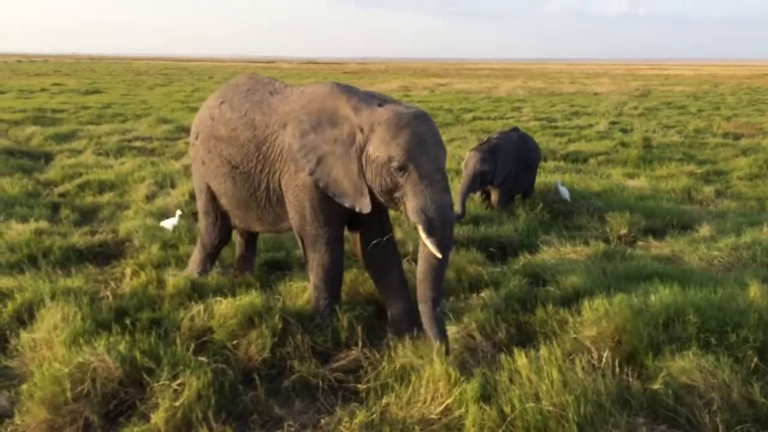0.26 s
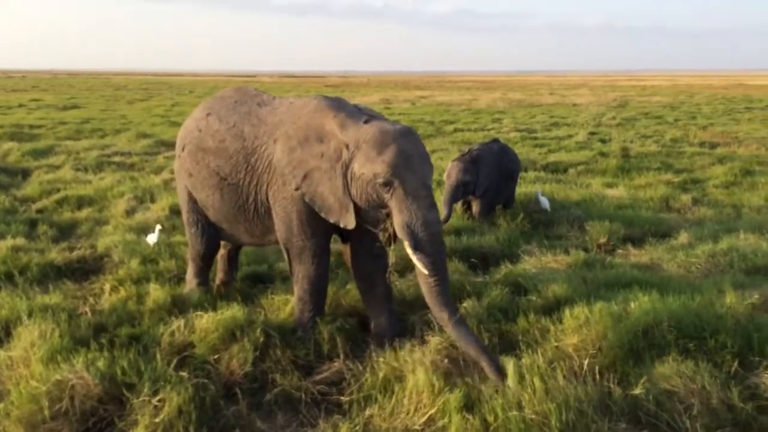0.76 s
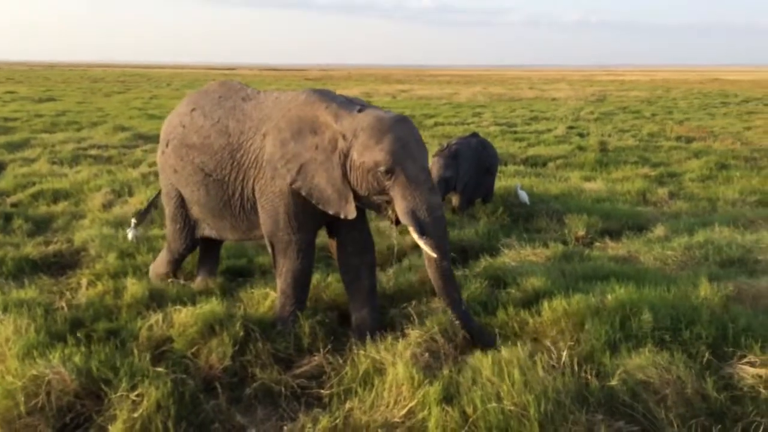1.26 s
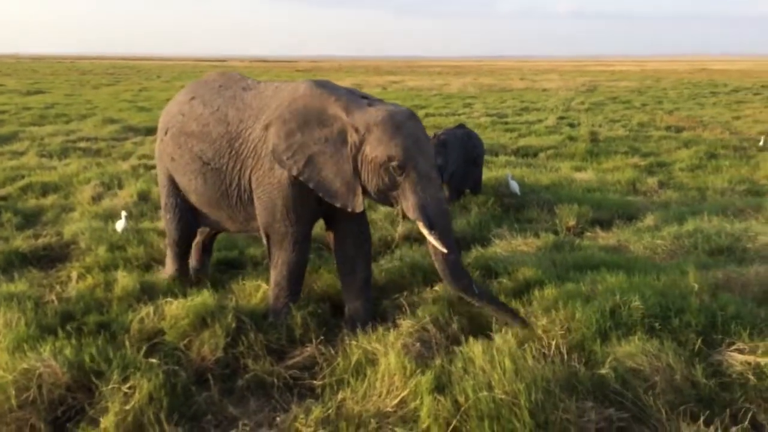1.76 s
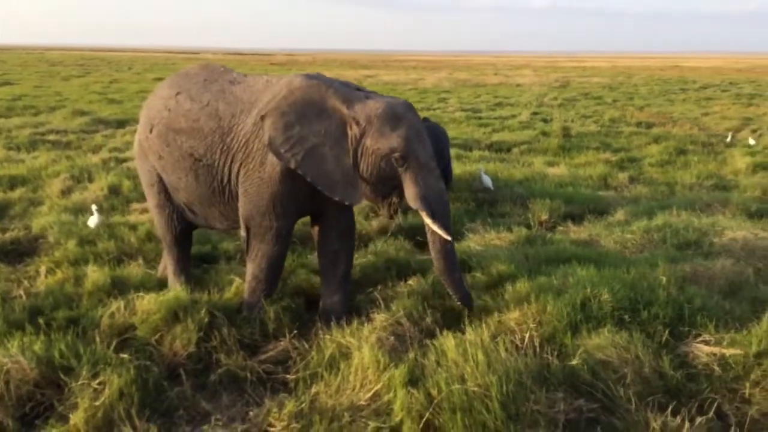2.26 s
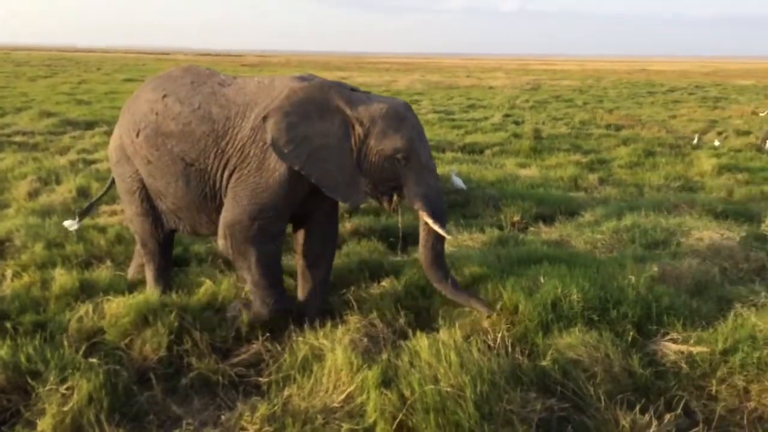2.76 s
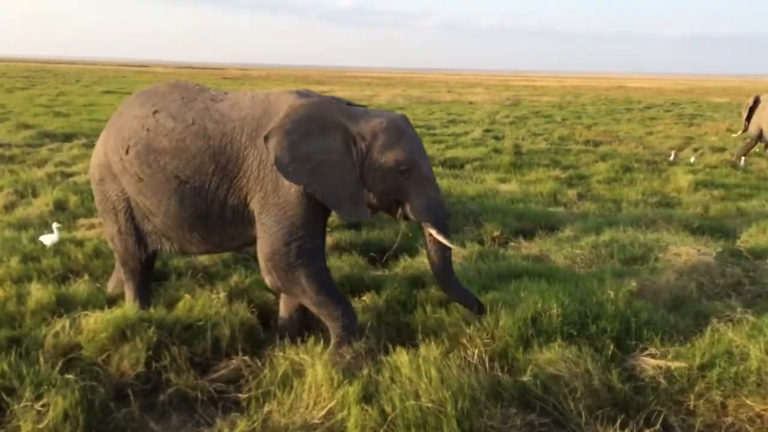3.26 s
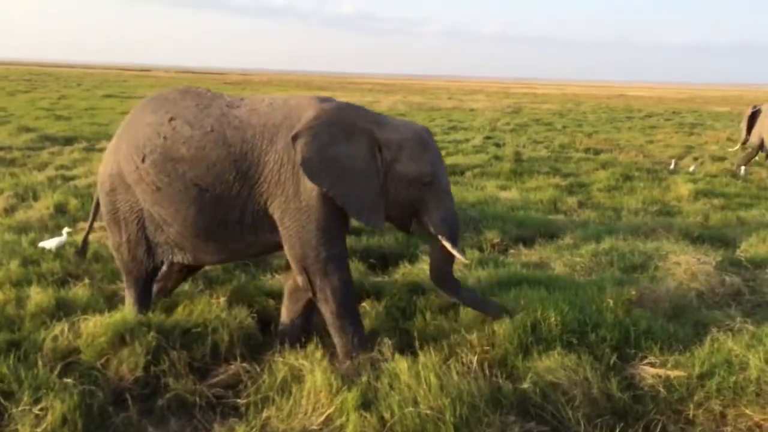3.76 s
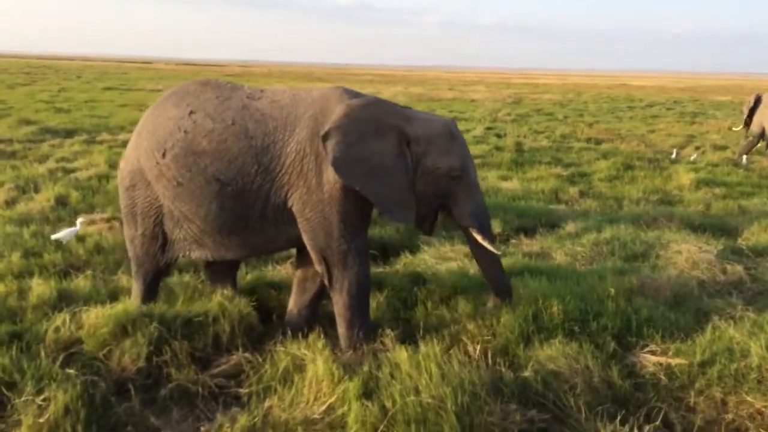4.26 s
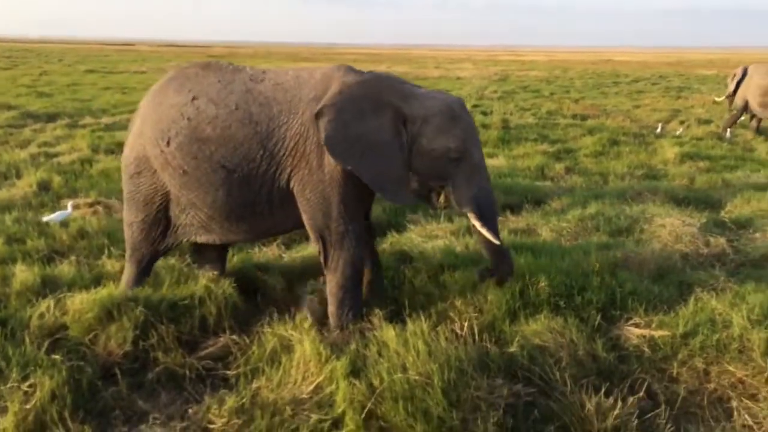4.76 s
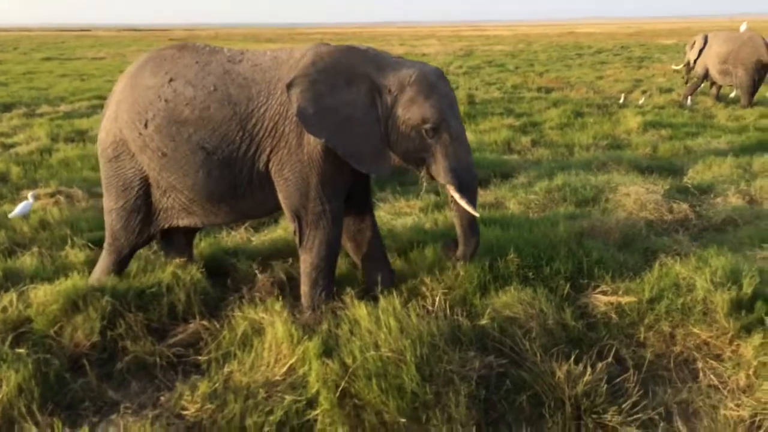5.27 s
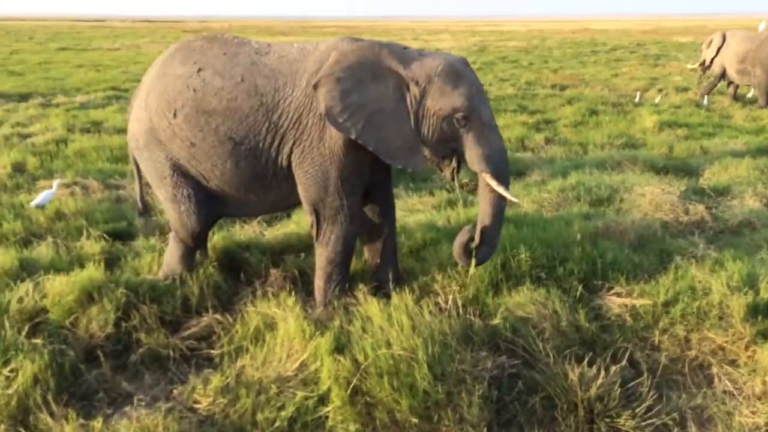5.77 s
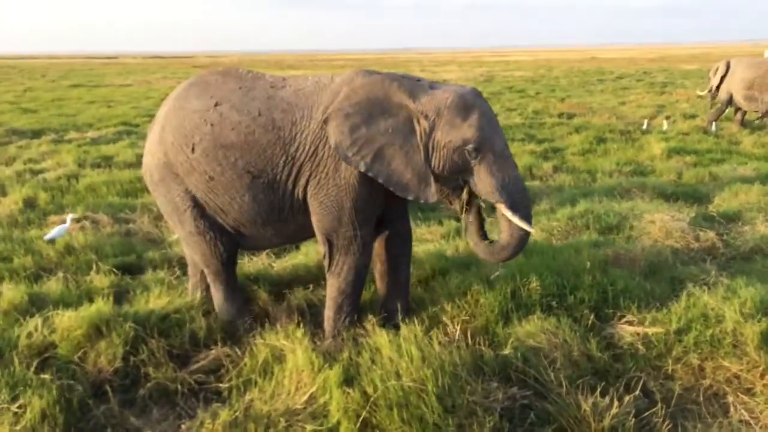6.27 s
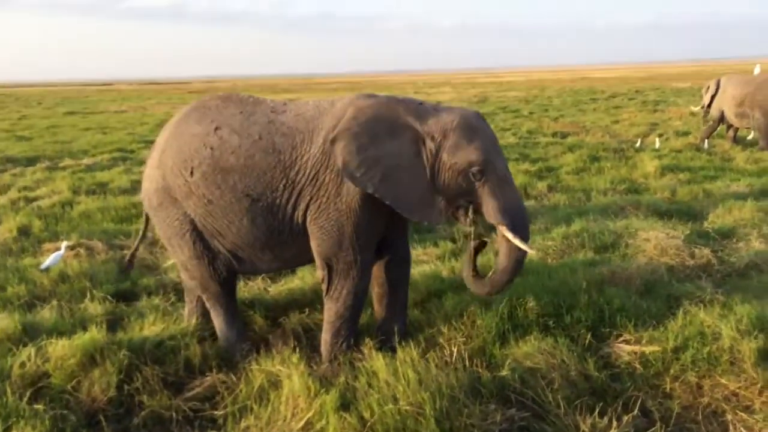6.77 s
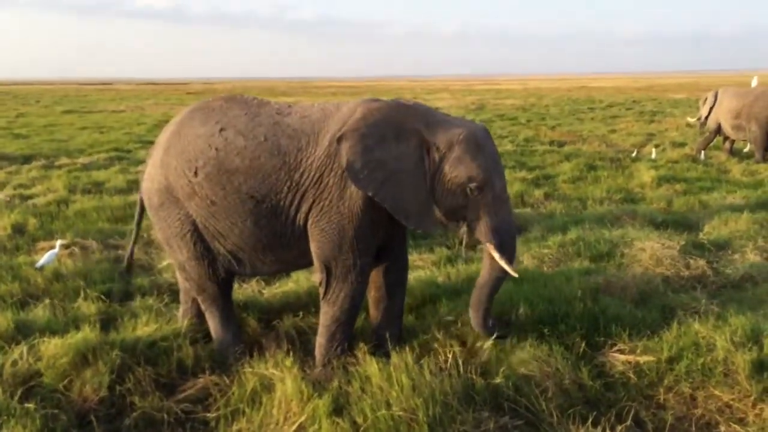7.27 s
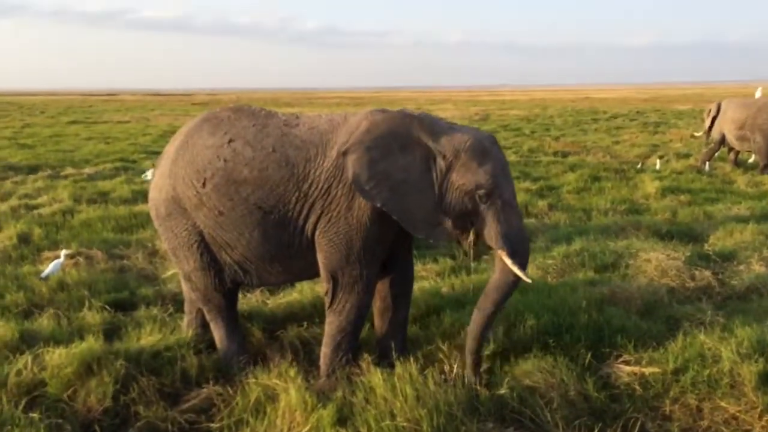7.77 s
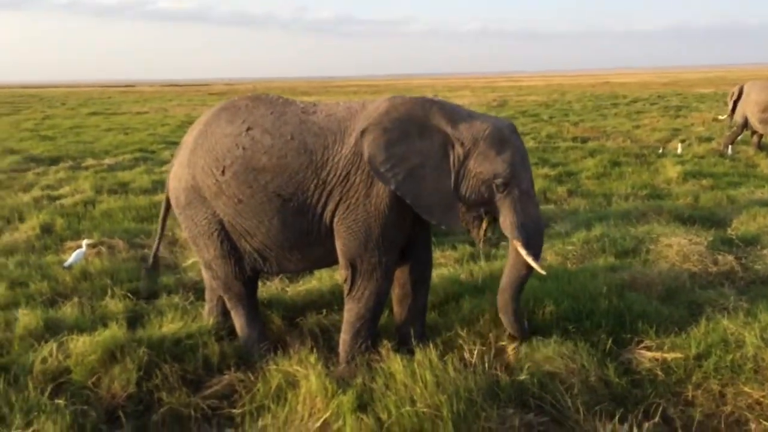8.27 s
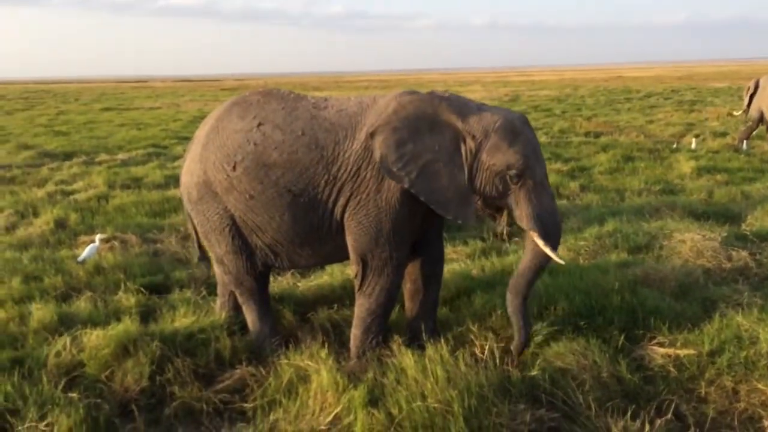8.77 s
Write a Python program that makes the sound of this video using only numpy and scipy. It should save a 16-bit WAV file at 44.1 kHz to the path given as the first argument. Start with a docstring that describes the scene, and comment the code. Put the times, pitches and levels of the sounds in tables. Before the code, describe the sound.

Rough wind buffeting dominates the opening, then thins to soft low gusts with occasional bursts. Beneath it a diesel engine idles nearby, clattering quickly and droning, clearer as the wind eases. Close grass hisses as a feeding elephant moves, strongest from three to six seconds, with a short dry crackle of breaking stalks around five. Open air, no echo.

```python
"""Elephant grazing beside an idling diesel

Trunk and feet swish through long grass as filtered noise; stalks snap as impulses ring their modes.
The engine of a standing vehicle layers knock and valve bursts, exhaust boom, drone, panels and whine.
Wind rumbles on the microphone as lumpy noise and breaks into vortex pulses: flurries and single thumps."""
import sys
import numpy as np
from scipy.fft import rfft, irfft, next_fast_len
from scipy.io import wavfile
from scipy.ndimage import uniform_filter1d, minimum_filter1d, map_coordinates

SR = 44100
rng = np.random.default_rng(int(sys.argv[2]) if len(sys.argv) > 2 else 0)


def int16_out(signal):
    """Quantize to a 16-bit WAV file."""
    q = np.round(np.clip(np.atleast_2d(signal).T, -1, 1) * 32767)
    wavfile.write(sys.argv[1], SR, q.astype(np.int16))


N = 398160


def amp(db):
    """Decibels to gain."""
    return 10 ** (np.asarray(db) / 20)


def unit(x):
    """Scale to rms 1."""
    return x / np.sqrt(np.mean(x ** 2) + 1e-20)


def level(rows):
    """(t/s, level/dB) rows to one gain per sample."""
    return amp(np.interp(np.arange(N) / SR, *np.transpose(rows)))


def wobble(rate):
    """A smooth random curve, rate knots a second."""
    knots = rng.standard_normal(int(N * rate / SR) + 4)
    return map_coordinates(knots, [np.arange(N) * rate / SR])


def filtered(x, response):
    """x times a response of frequency."""
    size = next_fast_len(N + SR // 2)
    return irfft(rfft(x, size) * response(np.fft.rfftfreq(size, 1 / SR)), size)[:N]


def coloured(x, spectrum):
    """x shaped by (f/Hz, level/dB) points on a log axis."""
    hz, db = np.transpose(spectrum)
    return filtered(x, lambda f: amp(np.interp(np.log(f + 1), np.log(hz), db)))


def noise(spectrum):
    """Coloured noise of rms 1."""
    return unit(coloured(rng.standard_normal(N), spectrum))


def resonance(f, hz, width):
    """Response of one damped mode."""
    return 1j * f * width / (hz * hz - f * f + 1j * f * width)


def modes(f, rows, order):
    """Parallel modes from (f/Hz, width/Hz, level/dB) rows, each resonance raised to the order."""
    return sum(amp(db) * resonance(f, hz, width) ** order for hz, width, db in rows)


def add(track, s, sound):
    """Mix a sound into the track from time s."""
    where = round(s * SR) + np.arange(len(sound))
    inside = (where >= 0) & (where < N)
    track[where[inside]] += sound[inside]


def envelope(start, attack, hold, release):
    """Exponential rise up to the start, a hold, an exponential fall."""
    t = np.arange(N) / SR - start
    return np.exp(np.minimum(0, np.minimum(t / attack, (hold - t) / release)))


def crackle(rate, size_db):
    """Sparse random impulses of very unequal size, about rate a second."""
    hits = rng.random(N) < rate / SR
    size = amp(size_db * np.clip(rng.standard_normal(N), -2, 2))
    return hits * rng.standard_normal(N) * size


# Strokes of trunk and feet through the grass: hold start t/s, attack/s, hold/s, level/dB
GRASS_STROKES = [(0, .05, 0.14, -58), (.37, .04, 0.12, -59), (0.922, .08, .07, -65.5),
                 (1.567, 0.066, .03, -66), (1.898, .05, .24, -60.5), (2.333, .066, 0.074, -63.5),
                 (2.812, 0.15, 0.55, -57.5), (3.316, 0.11, 0.099, -49), (3.995, 0.12, 0.046, -50),
                 (4.53, .1, .3, -57.5), (4.976, 0.15, 0.4, -50.5), (5.667, .067, .05, -60.5),
                 (5.94, 0.071, 0.16, -52), (6.455, .04, .02, -63.5), (7.11, .01, .16, -59),
                 (7.52, 0.15, .2, -64.5), (8.05, .12, 0.18, -63.5), (8.462, .15, 0.19, -60.5)]
# Colour of the blades' hiss: f/Hz, relative level/dB
BLADE_HISS = [(500, -14), (2000, 4), (3500, -3.5), (5000, -3), (7000, -2), (10000, -1), (14000, 0),
              (16000, -5.5)]
STROKE_RELEASE_S = 0.22  # blades settle after a stroke
BLADES_DB = -67.5  # hiss when only the wind stirs the blades


def brushing():
    """Blades hiss as they slide past each other, with many small catches grained into the noise."""
    catches = unit(crackle(rate=2500, size_db=9.5))
    swish = unit(coloured(rng.standard_normal(N) + 0.34 * catches, BLADE_HISS))
    strokes = [amp(db) * envelope(s, attack, hold, STROKE_RELEASE_S)
               for s, attack, hold, db in GRASS_STROKES]
    # strokes and the resting hiss add by power
    motion = np.sqrt(amp(BLADES_DB) ** 2 + np.sum(np.square(strokes), axis=0))
    return motion * amp(2.2 * wobble(12)) * swish


# Pull on the tuft while its fibres tear: t/s, relative crackle level/dB
TUFT_PULL = [(4.55, -99), (4.85, -52), (5.0, -44), (5.14, -47), (5.28, -69.5), (5.37, -48), (5.47, -55),
             (5.58, -64.5)]
# Stalks that snap: t/s, relative break level/dB
STALK_SNAPS = [(4.673, -21), (4.825, -24), (4.991, -19), (5.0133, -14), (5.031, -27), (5.065, -22),
               (5.0838, -7), (5.106, -13), (5.116, -10), (5.136, -20), (5.352, -22.5), (5.362, -22),
               (5.3857, -13), (5.459, -27.5)]
# Ringing modes of a breaking stalk: f/Hz, width/Hz, relative level/dB
STALK_MODES = [(2470, 350, -8.5), (2960, 430, 1), (4000, 610, -2), (4660, 460, 0), (5450, 390, -1),
               (6260, 1100, -2.5), (9050, 4000, -11), (14640, 3000, -10.5)]


def tearing():
    """Pulled fibres crackle and whole stalks snap; each break excites the modes of the stalk."""
    breaks = level(TUFT_PULL) * amp(-8.0) * unit(crackle(rate=250, size_db=-1))
    t = np.arange(SR // 20) / SR
    for s, db in STALK_SNAPS:
        # one sharp break, then the last fibres let go, 60 dB down in 28 ms
        fibres = amp(-22) * amp(-60 * t / .028) * rng.standard_normal(len(t))
        add(breaks, s, amp(db) * ((t == 0) + fibres))
    return amp(4.0) * filtered(breaks, lambda f: modes(f, STALK_MODES, order=1))


def grass():
    """Sliding blades and breaking stalks sound together as the animal feeds."""
    return brushing() + tearing()


# The four cylinders in firing order: relative knock level/dB, relative valve tick level/dB, valve ring f/Hz
FIRING_ORDER = [(3.5, -9.5, 2100), (4.5, -0.5, 2164), (3.5, -8.5, 2290), (4.5, -5.5, 2000)]
# Colour of the combustion knock: f/Hz, relative level/dB
KNOCK_COLOUR = [(200, -9), (600, 10), (950, -0.5), (1300, 5), (1520, -1.5), (1750, 4.5), (2300, -6),
                (2850, -5.5), (3200, -16.5), (3800, -13.5), (5000, -30.5), (8000, -29), (15000, -54)]
FIRING_HZ, FIRST_FIRING_S = 21.607, .0365


def clatter(firings):
    """Each cylinder in turn ticks a valve at its own pitch, just ahead of its combustion knock."""
    track = np.zeros(N)
    for k, (knock_db, valve_db, hz) in enumerate(FIRING_ORDER):
        # seconds from this cylinder's nearest firing
        since = ((firings - k + 2) % len(FIRING_ORDER) - 2) / FIRING_HZ
        knock = np.exp(np.minimum(since / 0.003, -since / 0.016))
        early = since + 0.009
        valve = np.exp(np.minimum(early / 0.0014, -early / 0.0091))
        ring = unit(filtered(rng.standard_normal(N), lambda f: resonance(f, hz, width=280) ** 2))
        track += amp(knock_db) * knock * noise(KNOCK_COLOUR)
        track += amp(valve_db) * valve * ring
    return track * amp(wobble(16))  # the strength wanders by about a decibel


# Exhaust boom: multiple of the firing rate, relative level/dB
EXHAUST_BOOM = [(3, 2.5), (4, 3), (8, -4.5)]


def exhaust(firings):
    """Pressure pulses in the exhaust leave steady harmonics of the firing rate that waver in level."""
    boom = np.zeros(N)
    for order, db in EXHAUST_BOOM:
        phase = 2 * np.pi * (round(order) * firings + rng.random())
        boom += amp(db + 1.7 * wobble(8.2)) * np.sin(phase)
    return boom


# Panels of the vehicle: f/Hz, width/Hz, relative level/dB
BODY_PANELS = [(508, 85, 5.5), (627, 94, 4), (1204, 186, -3), (1297, 110, -4), (1675, 39, 3),
               (1860, 77, -13)]


def panels():
    """Body panels sing in narrow bands, as noise through damped modes."""
    return unit(filtered(rng.standard_normal(N), lambda f: modes(f, BODY_PANELS, order=2)))


def whine():
    """A thin tone whose pitch and level waver."""
    pitch = 1169 + 5 * wobble(25)
    return np.sin(2 * np.pi * np.cumsum(pitch) / SR) * amp(0.96 * wobble(11.0))


# Rise and dip of the whole engine: t/s, level/dB
ENGINE_LEVEL = [(0, -53), (.6, -46.5), (1.2, -54.5), (1.9, -47.5), (3.0, -45.5), (3.85, -45), (4.45, -48.5),
                (5.5, -44.5), (7.45, -44), (7.75, -47), (8.2, -44.5), (9.03, -44)]
# Colour of the engine block's drone: f/Hz, relative level/dB
BLOCK_DRONE = [(30, -22), (85, 13), (200, -12), (350, 2), (600, -9.5), (850, -5), (1250, -6.5),
               (1550, -6.5), (2100, -9.5), (3000, -17.5), (5000, -25), (15000, -46.5)]


def engine():
    """Firings knock the block, over exhaust boom, a noisy drone, singing panels and a whine."""
    firings = (np.arange(N) / SR - FIRST_FIRING_S) * FIRING_HZ
    drone = amp(-3.5) * noise(BLOCK_DRONE)
    mix = clatter(firings) + exhaust(firings) + drone + amp(-6.5) * panels() + amp(-9.0) * whine()
    return level(ENGINE_LEVEL) * mix


EDDY_SKEW = 1.19  # scatter in how lopsided the pressure pulses are [radians]


def eddy(hz, steep):
    """The pressure pulse of one passing vortex, centred; a higher steep gives more swings."""
    t = np.arange(-SR // 50, SR // 50) / SR
    core = (2 * steep - 1) / (2 * 2 * np.pi * hz)  # passing time that puts the mean energy at hz
    skew = np.exp(1j * EDDY_SKEW * rng.standard_normal())
    return np.real(skew * (1 - 1j * t / core) ** -steep)


def add_eddy(track, s, db, hz, steep):
    """Mix one vortex pulse into the track, centred on time s."""
    pulse = amp(db) * eddy(hz, steep)
    add(track, s - len(pulse) / 2 / SR, pulse)


def eddies(times, levels_db, hz, size_db, spread, steep):
    """A train of vortices that scatter in size and pitch; the quicker ones are weaker."""
    train = np.zeros(N)
    size, quick = np.clip(rng.standard_normal((2, len(times))), -1.6, 1.6)
    levels = levels_db + size_db * size - 1.0 * quick
    pitches = hz * np.exp(spread * quick)
    for s, db, pitch in zip(times, levels, pitches):
        add_eddy(train, s, db, pitch, steep)
    return train


def single_eddies(rows):
    """Lone vortices from (t/s, level/dB, f/Hz) rows, each a short pressure thump."""
    track = np.zeros(N)
    for s, db, hz in rows:
        add_eddy(track, s, db, hz, steep=4.3)
    return track


# Strong eddies that stand out: t/s, level before the port/dB, f/Hz
STRONG_EDDIES = [(0.0764, -23, 1038.0), (0.1745, -18.5, 700), (0.3042, -11, 474), (0.4769, -12, 252),
                 (0.5674, -8, 612.0), (0.5788, -12.5, 680), (0.678, -16, 520.0), (0.7214, -7, 661.0),
                 (0.8086, -5.6, 557), (0.8272, -10, 471.0), (0.8423, -10, 604.0), (0.8591, -10, 378.0),
                 (0.8759, -9.1, 353.0), (0.9551, -5.5, 464.0), (1.0079, -10, 614.0), (1.0346, -9.9, 900),
                 (1.0955, -7, 500.0), (1.1763, -17.5, 904.0), (1.1913, -10, 812.0), (1.3247, -20.6, 772.0),
                 (1.4214, -20, 569.0), (1.6206, -8, 400.0), (1.7766, -8, 505), (1.8984, -23, 831.0),
                 (1.917, -21, 626.0), (1.9756, -19, 577.0), (2.1626, -13.5, 588.0), (2.1977, -13, 571.0),
                 (2.2054, -15, 704), (2.3354, -16, 823.0), (2.4279, -8.7, 362.0), (2.682, -17, 850),
                 (2.8324, -20.5, 592.0), (3.0263, -20, 465.0), (3.8436, -18, 490), (4.0669, -11, 569.0),
                 (4.1418, -10, 560.0), (4.146, -8.0, 170.0), (4.1742, -5, 580), (4.3478, -2.7, 463),
                 (4.3962, -6, 423), (4.8117, -17.5, 457.0), (4.8329, -18, 501.0), (5.3409, -8.5, 480.0),
                 (5.8729, -18.2, 640), (6.028, -10.5, 415), (7.5019, -18.5, 381.0), (7.8127, -8, 409.0),
                 (7.8567, -18, 578.0), (7.8721, -13.5, 1100), (7.8911, -23, 523.0)]


def thumps():
    """Strong single vortices strike the microphone."""
    return single_eddies(STRONG_EDDIES)


EDGE_DB, EDGE_CURVE = 9.5, 1.4  # drop from the crest to either end of a flurry; roundness of the crest
EDDIES_PER_CYCLE, SHED_JITTER = .58, 0.17  # eddies per cycle of their pitch; scatter as share of spacing


def shed(s, swell, fade, db, hz, glide):
    """Vortices shed at a loose rate swell to a crest and die away; their pitch glides with the air speed."""
    place = np.arange(-22, 27)
    jitter = SHED_JITTER * rng.standard_normal(len(place)) * (place != 0)  # the crest stays on time
    t = (place + jitter) / (EDDIES_PER_CYCLE * hz)
    shape_db = -EDGE_DB * np.maximum(-t / swell, t / fade) ** EDGE_CURVE
    pitch = hz * 2 ** (glide * np.clip(t / (swell + fade), -.7, .7))
    heard = shape_db > -40
    train = eddies(s + t[heard], shape_db[heard], pitch[heard], size_db=3.0, spread=0.21, steep=4.2)
    rms = np.sqrt(train @ train / ((swell + fade) * SR) + 1e-20)
    return amp(db) * train / rms


# Flurries of eddies, levels before the port: crest t/s, swell/s, fade/s, level/dB, f/Hz,
# glide/octaves per swell plus fade, deep core level/dB
EDDY_FLURRIES = [(0.008, 0.012, 0.023, -17, 685, -0.072, -26.0),
                 (0.117, 0.0062, 0.0163, -24.5, 510, -0.77, -30.0),
                 (0.55, 0.007, 0.0288, -29, 501, 0.05, -26),
                 (0.698, 0.024, 0.0297, -22.6, 467.7, 0.9, -25.2),
                 (0.725, 0.014, 0.0102, -18.5, 383, -0.36, -21.5),
                 (0.858, 0.041, 0.0206, -23.5, 468, 0.56, -27),
                 (0.916, 0.0091, 0.0087, -19.5, 541, -0.31, -33),
                 (0.94, 0.016, 0.015, -20, 492, 0.48, -23.0),
                 (0.994, 0.0102, 0.0289, -15.5, 483, -0.32, -27),
                 (1.047, 0.0088, 0.03, -15.5, 449, 0.13, -18),
                 (1.09, 0.0318, 0.0281, -19, 469, -0.59, -19.8),
                 (1.189, 0.017, 0.0345, -18.4, 432.4, 0.3, -24),
                 (1.238, 0.035, 0.0373, -21, 326.6, 0.57, -24.5),
                 (1.291, 0.015, 0.0185, -24, 427, -0.51, -36),
                 (1.337, 0.0208, 0.012, -19.1, 388, 0.039, -27),
                 (1.374, 0.0072, 0.0085, -21.5, 480.0, -0.14, -25),
                 (1.414, 0.0087, 0.0099, -30.5, 520, -0.74, -30),
                 (1.469, 0.0027, 0.0524, -33.5, 498, 0.25, -33.5),
                 (1.517, 0.012, 0.011, -27.5, 294.0, 0.079, -31),
                 (1.571, 0.017, 0.011, -23.5, 368, 0.77, -28), (1.61, 0.024, 0.0083, -28, 364.0, 0.44, -35),
                 (1.677, 0.015, 0.0033, -24, 278.0, -0.21, -30.4),
                 (1.755, 0.0086, 0.0249, -25.5, 476, 0.47, -22.5),
                 (1.935, 0.0034, 0.061, -32.5, 398, 0.15, -33),
                 (2.165, 0.0264, 0.014, -28, 449, -0.05, -32),
                 (2.198, 0.0048, 0.0192, -25.5, 471.0, 0.03, -38),
                 (2.299, 0.0053, 0.035, -33.5, 472.0, -0.25, -33.5),
                 (2.377, 0.034, 0.0097, -28.5, 327, 0.0036, -38),
                 (2.427, 0.0086, 0.0194, -22.5, 317, -0.61, -31),
                 (2.681, 0.0041, 0.0397, -32, 455.0, 0.18, -37.9),
                 (2.773, 0.0162, 0.0071, -27.5, 430, -0.28, -31),
                 (2.911, 0.005, 0.0098, -26.5, 378, 0.47, -30.7),
                 (2.99, 0.034, 0.0283, -32.5, 440.6, -0.03, -35),
                 (3.084, 0.019, 0.01, -32, 408, 0.26, -36.5),
                 (3.478, 0.012, 0.014, -25.5, 384, -0.63, -32.5),
                 (4.071, 0.0057, 0.025, -20, 412, -0.9, -28),
                 (4.121, 0.0029, 0.013, -15.5, 480.0, -0.38, -25.0),
                 (4.142, 0.0126, 0.0231, -26, 385, -0.31, -21.5),
                 (4.232, 0.0219, 0.0064, -28, 454, -0.14, -40),
                 (4.307, 0.0113, 0.015, -27, 461, 0.25, -35.0),
                 (4.338, 0.0068, 0.012, -27, 445, -0.26, -32),
                 (4.415, 0.032, 0.014, -31.3, 341, -0.22, -31), (4.865, 0.028, 0.044, -30, 488, -0.72, -31),
                 (4.949, 0.013, 0.0138, -25.5, 481, -0.38, -29),
                 (4.973, 0.0071, 0.016, -27, 432.6, 0.091, -34.8),
                 (5.176, 0.032, 0.045, -33.5, 308.6, 0.3, -36.5),
                 (5.345, 0.02, 0.01, -25.5, 413, -0.23, -24.5),
                 (5.372, 0.019, 0.0128, -27.5, 505, 0.083, -41),
                 (5.441, 0.007, 0.045, -35.8, 343.0, 0.54, -31),
                 (5.593, 0.0153, 0.0348, -30, 389.0, -0.12, -33),
                 (5.741, 0.005, 0.0288, -29.5, 487, -0.14, -31),
                 (6.03, 0.011, 0.0092, -23, 355, 0.39, -27.5),
                 (6.113, 0.0054, 0.0075, -23.5, 486, -0.58, -26.5),
                 (7.626, 0.0052, 0.017, -19, 403, -0.2, -22),
                 (7.657, 0.0059, 0.0076, -22.5, 390, 0.17, -27.5),
                 (7.865, 0.0099, 0.0094, -19, 502, -0.04, -23)]
CORE_HZ = 149.3  # pitch of the slow vortices at the core of a flurry


def flurries():
    """Each flurry is a train of quick vortices riding on a deep core of slow ones."""
    track = np.zeros(N)
    for s, swell, fade, db, hz, glide, core_db in EDDY_FLURRIES:
        track += shed(s, swell, fade, db, hz, glide)
        track += shed(s, swell, fade, core_db, CORE_HZ, 0)
    return track


# Buffets with a hollow, briefly ringing body: start t/s, peak level before the port/dB, f/Hz
HOLLOW_BUFFETS = [(1.327, -15, 393), (2.423, -17, 340), (4.343, -18, 498), (5.592, -22.5, 520),
                  (6.025, -19.5, 548), (7.621, -10, 419)]
HOLLOW_RISE_S = 0.0044  # time to the peak; the ring fades on the same time scale


def hollows():
    """Some buffets ring at one pitch for a few cycles."""
    track = np.zeros(N)
    t = np.arange(SR // 20) / SR
    swell = t / HOLLOW_RISE_S * np.exp(1 - t / HOLLOW_RISE_S)
    for s, db, hz in HOLLOW_BUFFETS:
        add(track, s, amp(db) * swell * np.sin(2 * np.pi * hz * t))
    return track


# Fine turbulence between the flurries: t/s, level before the port/dB
FLUTTER_LEVEL = [(0, -33), (.25, -36), (.75, -33.5), (1.31, -35.5), (1.68, -38), (2.74, -43), (2.89, -35),
                 (3.12, -47), (3.34, -51), (3.6, -42), (4.27, -39.5), (4.5, -41), (5.5, -42.5), (6.4, -45),
                 (8, -42), (9.03, -57)]
STRAY_PER_S, STRAY_HZ = 5.3, 560  # rate and middle pitch of small stray eddies
STRAY_DB, STRAY_SCATTER_DB = 9.5, 9.5  # their level over the flutter, and its spread either way


def flutter():
    """Weak vortices cross the port all the time, a few of them standing out."""
    count = 2700
    crossings = (np.arange(count) + rng.random(count)) / count * N / SR
    dense = eddies(crossings, 0, hz=322, size_db=3.0, spread=0.4, steep=2.2)
    dense = unit(dense * amp(4.9 * wobble(30)))
    draws = rng.random((int(STRAY_PER_S * N / SR), 3))
    strays = single_eddies([(when * N / SR,
                             STRAY_DB + STRAY_SCATTER_DB * (2 * size - 1),
                             STRAY_HZ * 2 ** (quick - .5)) for when, size, quick in draws])
    return level(FLUTTER_LEVEL) * (dense + strays)


# Soft gusts on the microphone: t/s, rumble level/dB
GUSTS = [(0.0, -29), (0.17, -33), (0.27, -29.5), (0.45, -29), (0.6, -30.3), (0.78, -33), (1.1, -35),
         (1.43, -35.5), (1.7, -32.5), (1.87, -32.8), (2.12, -25.5), (2.3, -29.2), (2.48, -30), (2.6, -29.1),
         (2.88, -27.5), (3.05, -30.5), (3.17, -35.2), (3.36, -35.0), (3.52, -26), (3.66, -27),
         (3.78, -28.5), (3.98, -26), (4.28, -33), (4.42, -34.5), (4.52, -35), (4.72, -32.6), (5.05, -36),
         (5.2, -33), (5.28, -30), (5.45, -37), (5.66, -36), (5.82, -40.5), (5.98, -29.6), (6.22, -37),
         (6.5, -37), (6.72, -37), (6.85, -29.5), (6.98, -36), (7.1, -27.5), (7.24, -39), (7.44, -30),
         (7.74, -37), (7.95, -29), (8.08, -40.5), (8.24, -30), (8.5, -35.5), (8.72, -45), (9.03, -34.5)]
# Colour of the rumble: f/Hz, relative level/dB
RUMBLE_COLOUR = [(20, -37.5), (32, -11), (45, -7.5), (65, -2.5), (90, 1), (130, -1.5), (175, -1.5),
                 (240, -10), (340, -15.5), (600, -31), (1500, -78.5)]
# Response of the microphone port to buffets: f/Hz, gain level/dB
PORT_RESPONSE = [(20, -44.5), (60, -3), (120, 2), (200, 3), (280, -1), (440, -1.5), (700, -2), (1200, -1),
                 (2000, 1), (4000, 13), (8000, -9)]
# brief ring of the cavity behind the microphone port
CAVITY_HZ, CAVITY_WIDTH_HZ, CAVITY_DB = 480, 120, -8.5


def wind():
    """A lumpy rumble that swells with every gust, under the vortices that cross the port and ring its cavity."""
    lumps = rng.standard_normal(N) * amp(1.84 * wobble(25))
    rumble = level(GUSTS) * unit(coloured(lumps, RUMBLE_COLOUR))
    ease_in = np.sin(np.pi / 2 * np.minimum(1, np.arange(N) / SR / .003)) ** 2  # over 3 ms
    vortices = thumps() + flurries() + hollows() + flutter()
    buffets = coloured(ease_in * vortices, PORT_RESPONSE)
    return rumble + filtered(buffets, lambda f: 1 + amp(CAVITY_DB) * resonance(f, CAVITY_HZ, CAVITY_WIDTH_HZ))


def scene():
    """Grass, engine and wind at one microphone."""
    return (grass() + engine() + wind())[None]


TOP_HZ = 15600  # nothing passes above this


def record(dry):
    """A fast limiter holds down the strongest buffets, then a sharp low-pass sets the band limit."""
    ceiling = .7
    # the gain drops ahead of each peak and glides back, within some 5 ms
    needed = minimum_filter1d(np.minimum(1, ceiling / (np.abs(dry[0]) + 1e-9)), size=221)
    gain = uniform_filter1d(uniform_filter1d(needed, size=110), size=110)
    return filtered(dry[0] * gain, lambda f: f < TOP_HZ)[None]


dry = scene()
out = record(dry)
int16_out(out)
```